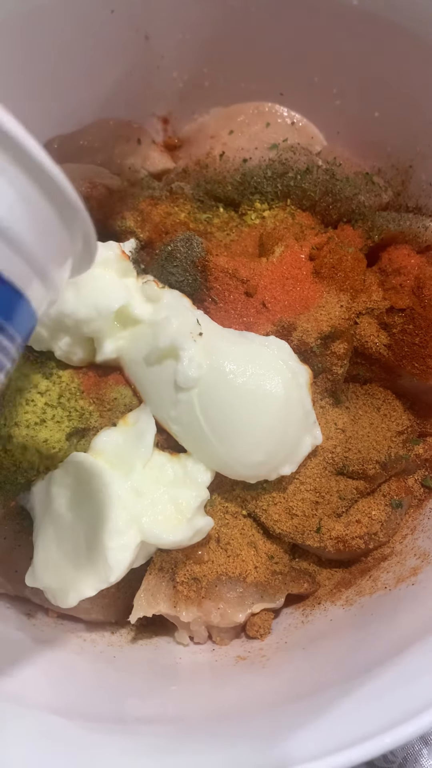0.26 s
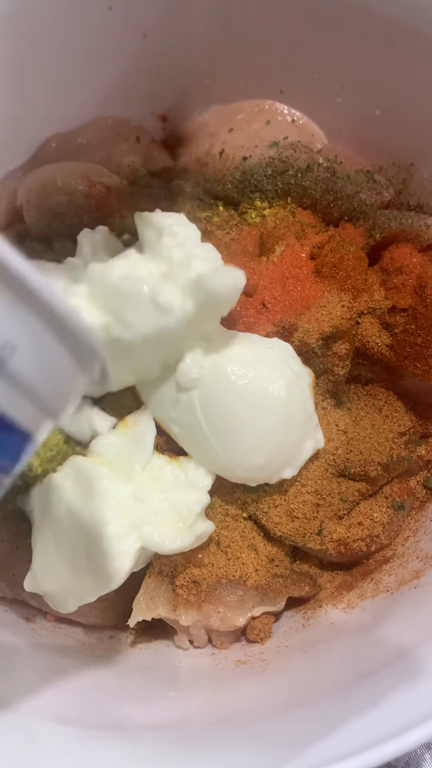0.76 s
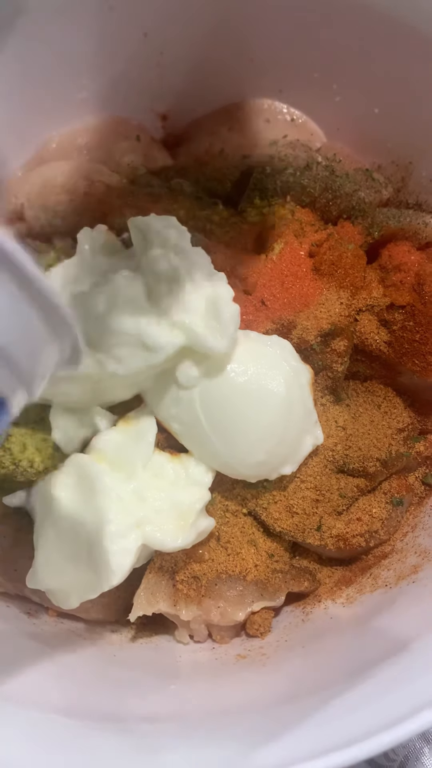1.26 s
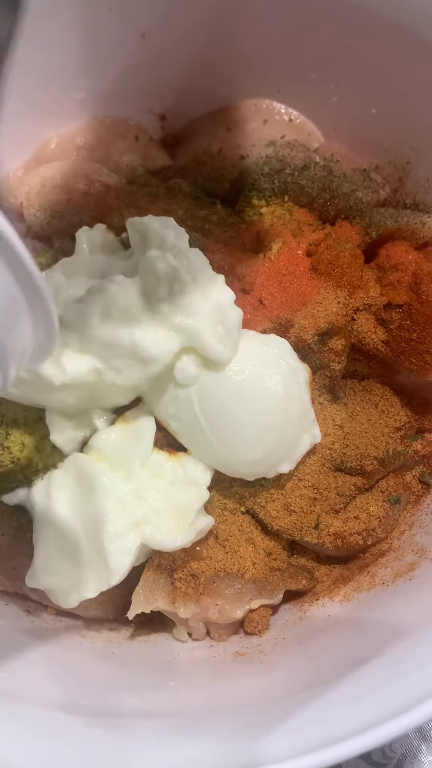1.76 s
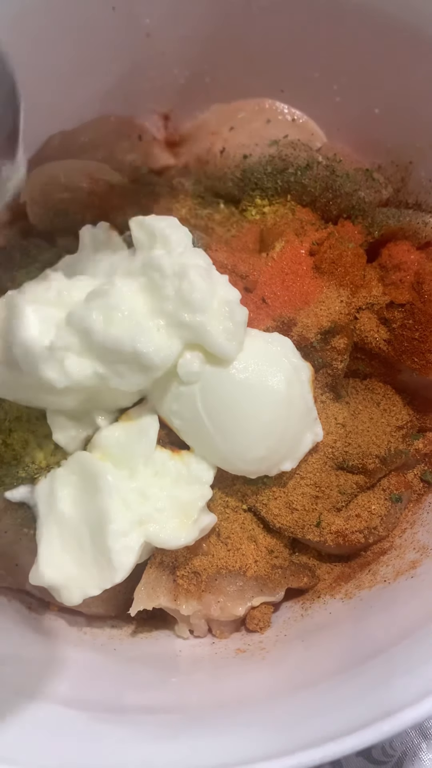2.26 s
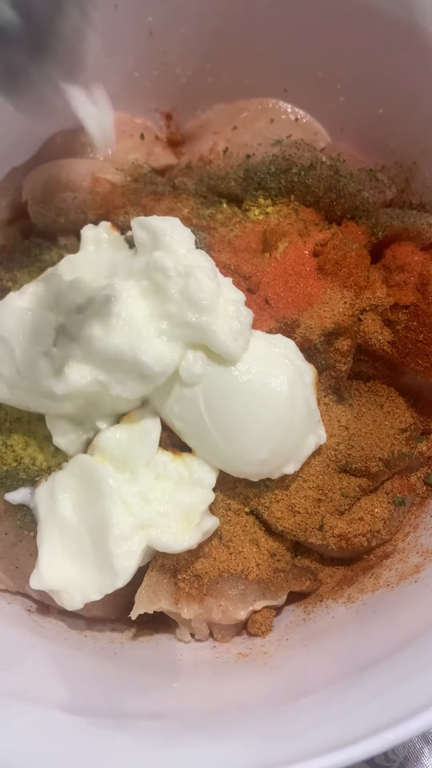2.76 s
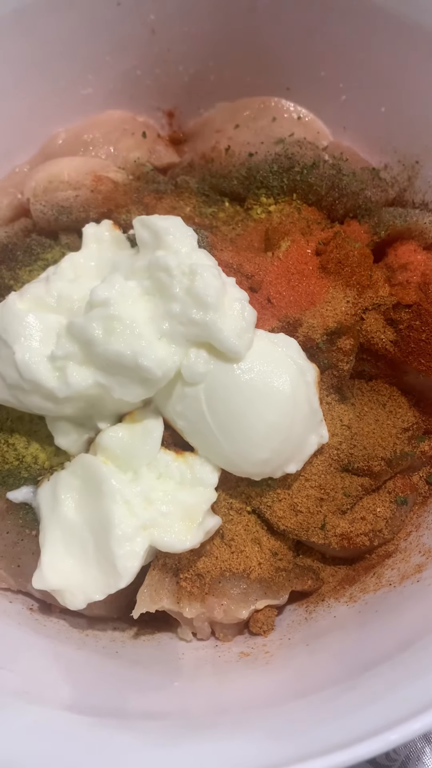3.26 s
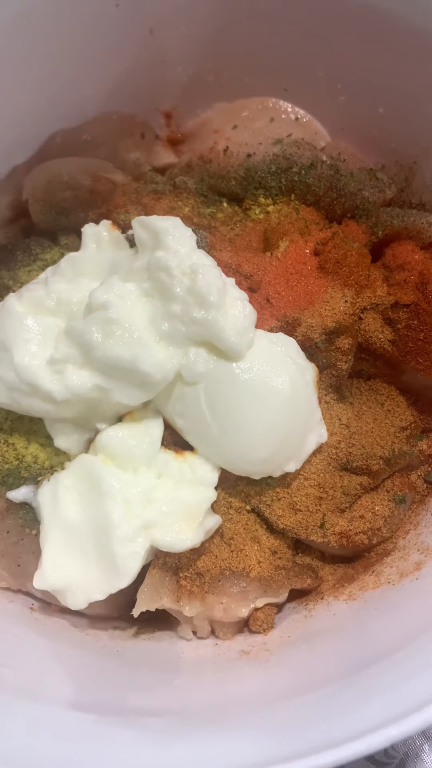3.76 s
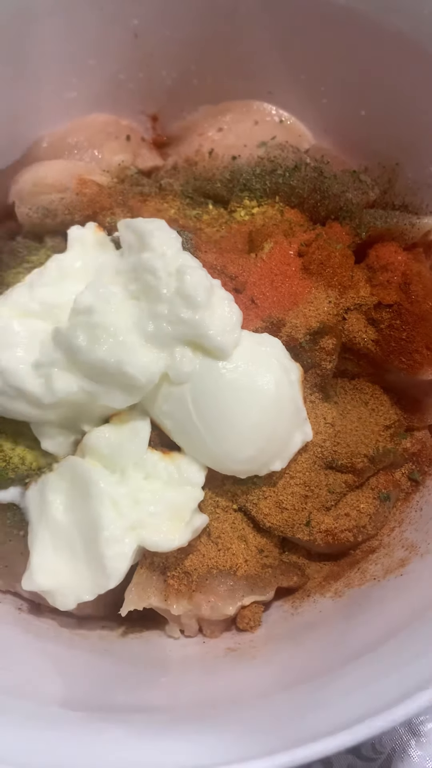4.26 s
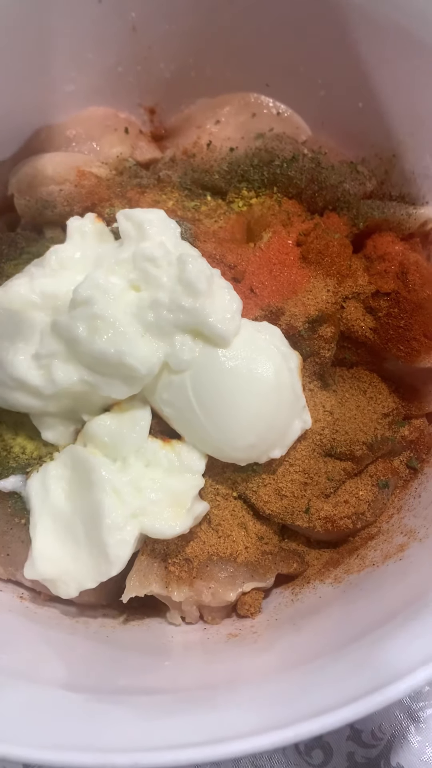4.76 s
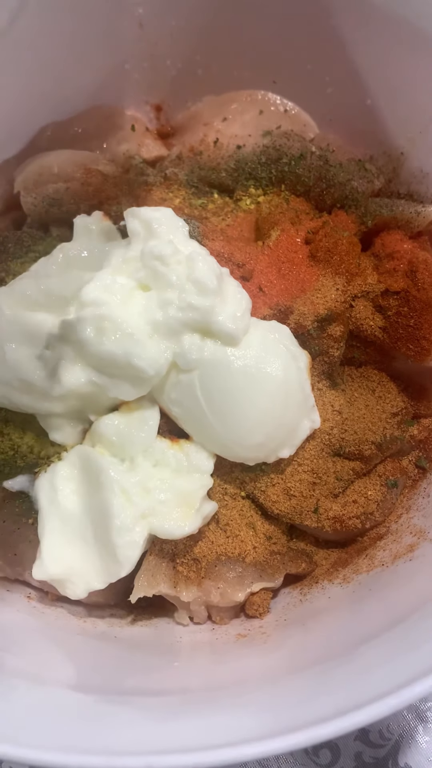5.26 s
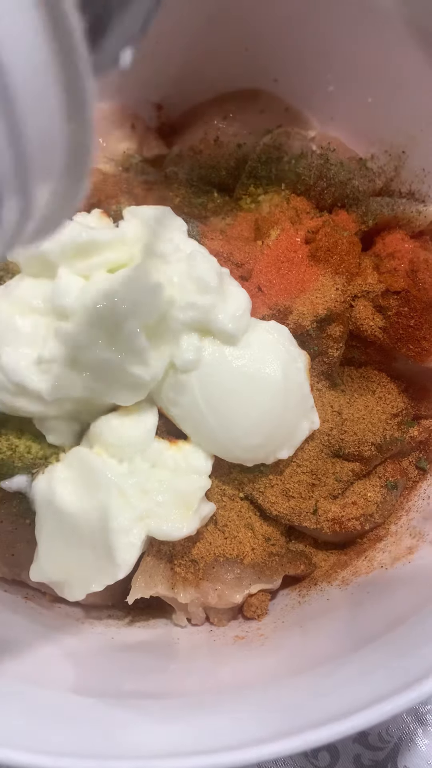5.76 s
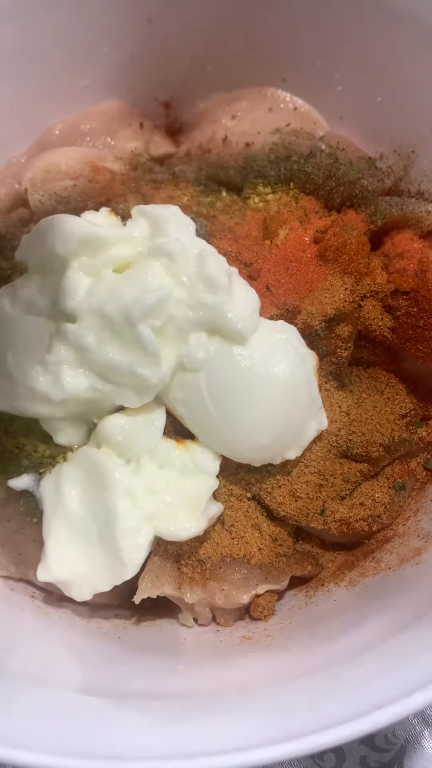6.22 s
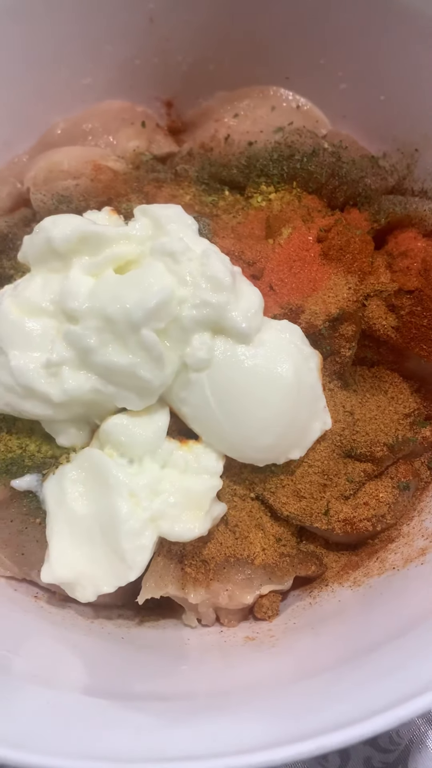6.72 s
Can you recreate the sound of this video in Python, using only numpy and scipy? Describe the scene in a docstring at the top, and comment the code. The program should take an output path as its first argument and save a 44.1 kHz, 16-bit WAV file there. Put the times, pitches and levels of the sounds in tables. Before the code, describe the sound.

A metal spoon knocks sharply and scrapes inside a thin plastic yogurt tub, hollow clacks up close in a quiet, faintly humming kitchen.

```python
"""A steel spoon taps and scrapes inside a thin plastic tub of yogurt, close to a phone in a quiet kitchen.
Each tap is a few ms of crackling contact that sets rim, walls, floor and air cavity ringing; each stroke
is noise of tiny slips through the same resonances, and wet ticks are short bursts of pitched noise.
Further off, decaying lines of noise make a clatter; a faint high whistle, a gliding tone, sweeps down and
up about once a second over the hum of the room, shaped noise. Sparse echoes add the kitchen."""
import sys
import numpy as np
from scipy import signal
from scipy.fft import rfft, irfft, next_fast_len
from scipy.io import wavfile
from scipy.ndimage import uniform_filter1d

SR = 44100
rng = np.random.default_rng(int(sys.argv[2]) if len(sys.argv) > 2 else 0)


def inscribe(sig):
    """Save sig as 16-bit PCM at rate SR to the path in sys.argv[1].

    A 1-D sig is mono; a 2-D sig holds one channel per row.
    Samples are clipped to [-1, 1] before scaling.
    """
    pcm = np.round(np.clip(np.atleast_2d(sig).T, -1, 1) * 32767)
    wavfile.write(sys.argv[1], SR, pcm.astype(np.int16))


N = 308259  # samples, about 7 s

# spoon taps: t/s, peak levels of crack/dB, thump/dB, low wall/dB and cavity/dB, cavity f/Hz,
# upper wall f/Hz (first mode), upper wall peak level/dB, bright edge peak level/dB
TAPS = [(0.2261, -19, -31.5, -43.5, -18.5, 646, 873, -21.5, -22),
        (0.506, -4.5, -47, -23.5, -14.5, 643.5, 980, -14.5, -5),
        (0.8139, -12, -29, -26.5, -27, 668, 960, -26.5, -11.5),
        (0.9389, -8, -52.5, -36, -20.5, 501, 990, -16.5, -12.5),
        (0.9521, -28.5, -60, -42, -33.5, 480, 1023, -39, -25),
        (0.9653, -21.5, -48, -47.5, -26.5, 542, 1001, -11.5, -27),
        (0.9769, -25, -53, -48, -31, 706, 970, -22, -28.5),
        (1.275, -15.5, -40, -22.5, -29.5, 528, 973, -17, -10.5),
        (1.2884, -30.5, -50, -37.5, -50, 680, 1020, -64, -34),
        (1.3541, -12, -31, -36.5, -19.5, 673, 940, -11, -11.5),
        (1.3719, -22, -41, -41, -37.5, 598, 1110, -30.5, -31),
        (1.6364, -4, -37, -16, -19, 673, 1010, -11, -11),
        (1.667, -32, -48, -45.5, -36.5, 650.4, 1050, -26.5, -26),
        (1.673, -28, -44.5, -45, -26, 651, 1140, -17.5, -24.5),
        (1.9627, -29, -34.5, -24.5, -20.5, 519.7, 910, -15, -8.5),
        (2.0541, -21.5, -44, -34, -22, 550.7, 831, -24.5, -41),
        (2.075, -14.5, -50.5, -28, -21.5, 536, 885, -31, -24),
        (3.49, -24, -51, -37.5, -28, 559, 900, -24, -22.5),
        (3.9828, -15.5, -61, -36, -49, 800, 828, -35, -25.5),
        (4.1528, -15, -43, -20, -36.5, 572, 936, -20, -12.5),
        (4.271, -21.5, -64, -34, -50, 570, 990, -46, -33),
        (4.4781, -19, -34, -40, -48.5, 585, 1040, -37, -34.5),
        (4.5283, -11, -32.5, -23.5, -23.5, 653, 1063, -13.5, -22),
        (4.9503, -40, -40.5, -41.5, -44, 624, 1073, -67, -31),
        (5.4248, -17.5, -43, -36.5, -17.5, 588, 930, -14.5, -12),
        (5.4472, -25, -40, -41, -23, 545, 898, -24, -34),
        (6.3405, -39.5, -40.5, -49.5, -57, 732, 850, -42.5, -45),
        (6.4409, -38, -49, -65.5, -59, 540, 1190, -50, -53),
        (6.9109, -30.5, -54.5, -31, -37.5, 618, 1053, -25.5, -36)]
# Resonances: f/Hz, width/Hz (before any damping factor), relative level/dB
CAVITY = [(632.8, 22, 7), (626.6, 100, 2.5)]  # air in the tub, a long ring on a short one: f/Hz, width/Hz, level/dB
LOW_WALL = [(170, 79, -8.5), (309, 100, 0), (403, 78, 4)]  # floor of the tub: f/Hz, width/Hz, level/dB
WALLS = [(950.6, 150, 5), (1246, 230, 3.5), (1248, 120, 8.5), (1834, 590, 0.5)]  # sides of the tub, moved in pitch by each tap: f/Hz, width/Hz, level/dB
RIM = [(2122, 46, 3), (2290, 200, -2), (2840, 260, -2), (3065, 140, -1), (3550, 380, 1), (4410, 900, 0.5)]  # rim of the tub: f/Hz, width/Hz, level/dB
EDGE = [(4750, 600, 1), (5300, 400, -1), (5900, 200, 0), (6650, 200, 0), (7200, 400, -3), (7650, 250, -2),
        (8700, 600, -4)]  # bowl of the spoon: f/Hz, width/Hz, level/dB
# fizz, the top of the contact noise: f/Hz, relative level per Hz/dB
FIZZ = [(8000, -35), (9300, 0.5), (12500, -4.5), (14000, -10.5), (15000, -24), (15800, -59.5)]


def taps(spot_spread_db=3.5, spiky_db=5.5, grip=3.0):
    """A rattling contact rings rim and spoon, damped by the grip, and pushes walls, cavity and tub."""
    # the hand-held tub jolts: f/Hz, width/Hz, level/dB, all for one of two passes
    thump_modes = [(46.6, 17, -1.5), (73, 46, 2.5), (143, 64, -0.5)]
    crack_t60_s, rise_s = 0.018, 0.00045
    fizz_under_edge_db, hand_damping = -14, 1.1
    out, t = np.zeros(N), np.arange(8192) / SR
    chance = rng.standard_normal((len(TAPS), 3, len(t)))
    fall = gain_of(-60 * t / crack_t60_s) * np.minimum(t / rise_s, 1)
    fade_out = np.minimum(4 - 4 * t / t[-1], 1)
    for tap, (noise, spikes, spot) in zip(TAPS, chance):
        s, crack_db, thump_db, low_db, cavity_db, cavity_hz, wall_hz, wall_db, edge_db = tap
        spot_db = spot_spread_db * spot[:8]
        contact = noise * gain_of(spiky_db * spikes) * fall
        contact[20] += 1.4 * abs(contact).max()  # the first touch is one hard click
        # each contact of the rattle pushes the wall one way
        blow = signal.lfilter([1], [1, -.93], peaked(contact) ** 2)
        crack = ring(contact, RIM, spot_db=spot_db, damping=grip)
        edge = ring(contact, EDGE, spot_db=spot_db, damping=grip)
        fizz = colour(spikes, FIZZ) * fall
        walls = ring(blow, WALLS, wall_hz / WALLS[0][0], spot_db=.5 * spot_db)
        cavity = ring(blow, CAVITY, cavity_hz / CAVITY[0][0], damping=hand_damping)
        low_wall = ring(blow, LOW_WALL, spot_db=spot_db)
        thump = ring(ring(blow, thump_modes), thump_modes)
        sound = (gain_of(crack_db) * peaked(crack)
                 + gain_of(edge_db) * peaked(edge)
                 + gain_of(edge_db + fizz_under_edge_db) * peaked(fizz)
                 + gain_of(wall_db) * peaked(walls)
                 + gain_of(cavity_db) * peaked(cavity)
                 + gain_of(low_db) * peaked(low_wall)
                 + gain_of(thump_db) * peaked(thump))
        add(out, s, sound * fade_out)
    return out


def strokes(grain_db=2.5, slips_per_s=5000.0, flutter_db=1.0, patchy_db=2.0, wander=1.0, steady_hz=3000.):
    """Dense tiny slips of steel on wet plastic, heard through spoon, rim, walls and cavity: mono, pair."""
    slips = rng.standard_normal(N) * gain_of(grain_db * np.minimum(rng.exponential(1, N), 4))
    slips *= .3 + (rng.random(N) < slips_per_s / SR)  # single slips stand out of a steady rub
    flutter = evened(uniform_filter1d(uniform_filter1d(rng.standard_normal(N), 300), 300))
    slips *= gain_of(flutter_db * flutter)
    spoon, low_wall, cavity, walls, rim = [
        evened(ring(slips, modes)) for modes in (EDGE, LOW_WALL, CAVITY, WALLS, RIM)]
    fizz = evened(colour(slips, FIZZ))
    fits_db = 4. * drift((1, N), 1, 1500)[0]  # the cavity's ring comes in fits
    cavity = evened(ring(cavity, CAVITY) * gain_of(fits_db))
    layers = np.array([spoon, low_wall, cavity, walls, rim, fizz])
    out = (layers * pressure()).sum(0)
    # as the contact moves over the wall the colour shifts in patches and the direction wanders
    z = signal.stft(out, nperseg=512, noverlap=384)[2]
    z = z * gain_of(patchy_db * drift(z.shape, 9, 14))
    bins = np.fft.rfftfreq(512, 1 / SR)[:, None]
    wander_rad = wander / (1 + bins / steady_hz)  # less wander in the treble
    turn = np.exp(1j * wander_rad * drift(z.shape, 4, 6))
    pair = signal.istft(np.array([z, z * turn]), nperseg=512, noverlap=384)[1][:, :N]
    return out, pair


def pressure():
    """Gain of each part over time: stroke pressure and rattles between close taps, chatter after each tap, a
    short swell before it."""
    # one curve a stroke, or a short rattle of the spoon between close taps: t/s, rubbing level/dB, # walls'
    # lift/dB, cavity's lift/dB above the rubbing; the answers below add to the level and share out the lifts
    stroke_curves = [
        [(0.25, -73, 8, 24.5), (0.308, -54, 1.5, -4.5), (0.418, -37, -9.5, -21.5), (0.43, -33, -16, -24),
         (0.444, -55.5, -3, -6.5), (0.478, -55, -10, -8), (0.49, -52, 0.5, 9)],
        [(0.835, -50.5, -3.5, 7.5), (0.867, -54, -9, -15.5), (0.907, -58, -3, -11), (0.925, -50, -1.5, 5.5)],
        [(0.947, -39, 8, 1), (0.955, -35, 2, 2), (0.967, -46, 14, 3), (0.973, -34, 11, 0), (0.99, -57, 10, 9.5)],
        [(1.18, -84, 19, 14), (1.186, -68, 0.5, -5), (1.206, -57.5, -9.5, -7.5), (1.246, -68.5, -2, -3.5),
         (1.26, -59, -2, 15)],
        [(1.297, -60, 7, 10.5), (1.329, -60, -6, -4.5), (1.338, -51, -7.5, 13.5)],
        [(1.362, -36, 7, 6), (1.368, -62, 7.1, 13), (1.376, -36, 8.1, 4), (1.39, -62, 16.3, 19)],
        [(1.65, -34, 8.3, 14), (1.656, -58, 1, 15), (1.676, -45, 7, 1), (1.695, -83, 10, 20)],
        [(1.98, -55, 4, 17.5), (1.996, -56.5, 8.5, 1), (2.034, -41.5, -6, -8.5), (2.044, -43, -4.5, -1.5),
         (2.058, -35.5, 3.5, -1), (2.082, -34.5, -0.5, -0.5), (2.1, -61, 8, 17.5)],
        [(3.3, -91, 1, 5), (3.304, -85.5, 6.3, 2), (3.334, -78, 10.4, -3.5), (3.4, -90, 14, 5),
         (3.446, -79.5, 11.7, 10), (3.462, -74, 12, -2), (3.468, -70, 5.5, 3)],
        [(3.515, -67, -1, 13), (3.559, -66, 8, 9), (3.605, -31.5, -16, -42), (3.643, -56.5, 0.5, -9),
         (3.687, -66.5, 5, 0), (3.763, -64, 4, -4), (3.82, -80, 5, 3)],
        [(3.838, -80, 12, 15), (3.854, -49, 3.9, -9.5), (3.86, -48, 6.3, -12), (3.872, -70, 3.3, 6.5),
         (3.89, -75, 10, 6)],
        [(4.0, -52.5, -3, -11), (4.044, -67.5, -1.5, -7), (4.114, -47, -10, -18), (4.132, -47, -16.5, -17),
         (4.14, -47, -14, -3.5)],
        [(4.175, -64, 5.5, 14), (4.189, -61.5, 1, 7), (4.229, -32.5, -10, -31), (4.249, -32.5, -9.5, -26),
         (4.313, -56, 7.5, 5), (4.359, -48, -12, -2), (4.38, -73, 5, 14)],
        [(4.43, -79, 5, 7), (4.438, -79, 3, 8), (4.446, -61.5, -9, -15), (4.452, -56, -10, -15),
         (4.46, -65, 0, 4), (4.466, -68, -4, 9)],
        [(4.488, -43, -2, 4), (4.506, -47, -11.5, -11), (4.516, -46, -4, -3)],
        [(4.555, -52.5, 3, 5), (4.605, -41, 1.5, -19), (4.647, -59.5, 13.5, 7), (4.683, -49, 9.5, -10),
         (4.717, -56, -1, 0), (4.781, -46.5, -4, -18), (4.81, -74, -3, -1)],
        [(4.928, -71, 2, 6.5), (4.932, -57, -2, 1), (4.944, -64.5, -2, 7)],
        [(4.953, -45.5, -9, -10), (4.985, -41, -15, -18), (5.011, -50, -8, -10), (5.071, -50, -0.5, 2),
         (5.107, -53, -6, -13.5), (5.157, -44, -6, -5.5), (5.19, -56, 0.5, -14.5)],
        [(5.19, -58.5, 4, 0.5), (5.244, -46.5, -1, 0), (5.274, -53, 3.5, -5), (5.326, -49.5, -3, 4),
         (5.356, -57.5, -6, 0), (5.396, -58, -18, -16), (5.414, -54, -7.5, 24.5)],
        [(5.434, -33, 1.6, 7), (5.44, -50, 3.6, 12), (5.446, -40.5, 1.4, 3.8), (5.452, -38.5, 4.9, 3.3),
         (5.46, -70, 13, 14)],
        [(5.9, -85.5, -2, 3), (5.918, -76, 1, -21), (5.952, -72.5, -19, -26), (5.994, -81, 3, -7),
         (6.26, -73, -14, -24), (6.308, -77, -2, -21), (6.325, -75.5, 4, 0)],
        [(6.36, -71.5, 2.8, -7), (6.39, -75, 3, -13.5), (6.422, -78, 14, 0.5), (6.446, -64.5, 7.6, -12),
         (6.458, -80, 9, -2), (6.48, -79.5, 9, -24), (6.5, -87.5, 5, -1)],
        [(6.93, -69.5, 27, 17), (6.985, -66.5, 7.3, 4.4)],
    ]
    # how spoon, low wall, cavity, walls, rim and fizz answer, in that order:
    # level/dB, share of the walls' lift/1, share of the cavity's lift/1
    part_answers = np.array([(2, 0., 0.), (-10, .7, 0.74), (-0.5, 0.14, 0.75), (-1.5, 1, 0.),
                             (3.5, 0.2, 0.027), (-9, 0, 0.)])
    touch_s = 0.012  # time to touch down or lift off
    # the spoon chatters on after a tap: level under the upper wall's ring, lifts of walls and cavity
    chatter_db, chatter_t60_s, chatter_lift_db = -30, 0.13, (5.5, 12.5)
    # a short swell of noise before each tap: level under the bright edge ahead of the answers, e-fold time
    swell_db, swell_s = -25, .003
    t = np.arange(N) / SR
    answer_db, shares = part_answers[:, :1], part_answers[:, 1:]
    gains = np.zeros((len(part_answers), N))
    for rows in stroke_curves:
        s, rub_db, *lift_db = np.transpose(rows)
        touch = np.clip(np.minimum(t - s[0], s[-1] - t) / touch_s + .5, 0, 1)
        on = touch > 0
        lifts = shares @ [np.interp(t[on], s, db) for db in lift_db]
        gains[:, on] += touch[on] * gain_of(np.interp(t[on], s, rub_db) + lifts)
    chatter, after = np.zeros(N), t[:SR // 3]
    swell_rise = np.exp(-after[::-1, None] / swell_s)
    for s, *_, wall_db, edge_db in TAPS:
        add(chatter, s, gain_of(wall_db + chatter_db - 60 * after / chatter_t60_s))
        add(gains.T, s - len(after) / SR, gain_of(edge_db + swell_db) * swell_rise)
    chatter_gains = chatter * gain_of(shares @ chatter_lift_db)[:, None]
    return gain_of(answer_db) * (gains + chatter_gains)


def ticks():
    """Yogurt lets go of spoon or wall and a film bursts: one or two ms of noise around a pitch."""
    # tiny wet ticks: t/s, peak level/dB, f/Hz
    tick_list = [(0.498, -31.5, 7400), (.5587, -31.5, 12200), (1.5601, -47.5, 11400), (1.7344, -48, 9760),
                 (4.448, -35, 6900), (5.5535, -55, 5520), (5.576, -47, 7080)]
    out, t = np.zeros(N), np.arange(400) / SR
    for (s, db, hz), noise in zip(tick_list, rng.standard_normal((len(tick_list), len(t)))):
        burst = noise * np.exp(-t / 0.00072)
        add(out, s, gain_of(db) * peaked(ring(burst, [(hz, 0.41 * hz, 0)])))
    return out


def clatter():
    """Far off, so the attack is smeared and only ringing lines arrive; the higher ones die sooner."""
    # far clatter: t/s, level/dB, rise at 3 kHz/s, t60 at 1 kHz/s, share of the brighter pieces/1
    clatter_list = [(0.733, -50.5, 0.0077, 0.68, 0.), (0.984, -44, 0.026, 0.5, 0.2),
                    (6.584, -49.5, 0.03, 0.55, 0.98)]
    # what rings in it: f/Hz, width/Hz, level among duller pieces/dB, level among brighter pieces/dB
    crockery_lines = [(471.3, 53, -5, -6), (885, 14, 0.5, -14), (1111, 10, 1.5, 2), (1200, 14, 1.5, -9),
                      (1260, 14, -3.5, -7), (1520, 14, -12, -1), (1748, 60, -15, -10.5),
                      (2420, 170, -13.5, -8.5), (2940, 65, -16, -12.5), (3850, 180, -0.5, -2.5),
                      (4500, 52, -9.5, 8.5), (5300, 40, -11.5, 1), (6040, 87, -7.5, 7),
                      (7400, 300, -20, -0.5), (10370, 300, -14.5, 8.5), (12500, 1500, -17.5, -9.5)]
    out, t = np.zeros((2, N)), np.arange(SR // 2) / SR
    chance = rng.standard_normal((len(clatter_list), 2, len(t)))
    for (s, db, rise, t60, bright), (a, b) in zip(clatter_list, chance):
        for side, noise in zip(out, (a, 1.2 * a + 0.32 * b)):  # the two channels are partly alike
            lines = np.zeros(len(t))
            for hz, width, dull_db, bright_db in crockery_lines:
                line_db = dull_db + bright * (bright_db - dull_db)
                decay_db = -60 * t / t60 * (hz / 1000) ** 0.623
                attack = np.minimum(t / rise * (hz / 3000) ** 0.37, 1)  # low lines build up more slowly
                lines += evened(ring(noise, [(hz, width, 0)])) * gain_of(line_db + decay_db) * attack
            add(side, s, gain_of(db) * lines)
    return out


def whistle():
    """A slightly fuzzy tone, its pitch jittered by smoothed noise, glides down, then quickly up."""
    # one sweep: t from its start/s, f before jitter/Hz, peak level/dB
    sweep_curve = [(0, 15750, -92.5), (0.038, 15500, -66), (.23, 14500, -69.5), (.27, 14600, -69.5),
                   (0.342, 15600, -85)]
    first_s, period_s, jitter_hz = -.07, 1.152, 150
    out, (s, hz, db) = np.zeros(N), np.transpose(sweep_curve)
    starts = first_s + period_s * np.arange(7)
    t = np.arange(0, s[-1], 1 / SR)
    for start, noise in zip(starts, rng.standard_normal((len(starts), len(t)))):
        pitch = np.interp(t, s, hz) + jitter_hz * evened(uniform_filter1d(noise, 60))
        tone = np.sin(2 * np.pi * np.cumsum(pitch) / SR)
        add(out, start, gain_of(np.interp(t, s, db)) * tone)
    return out


def hum():
    """Room hum: random short-time spectra with drifting patches, partly alike in both channels."""
    # colour of the hum: f/Hz, relative level per Hz/dB
    hum_spectrum = [(25, -24), (45, 0.5), (75, 6.5), (130, -4), (300, -9), (600, -19), (1050, -28),
                    (1400, -17), (2000, -29), (3200, -31), (4500, -30.5), (4950, -25.5), (5500, -27),
                    (6500, -36), (10000, -36), (13500, -38.5), (14800, -41.5), (15500, -71.5)]
    # f/Hz, left-right likeness/1
    hum_likeness = [(60, 1), (250, 0.49), (450, 0.1), (2000, 0.05), (3000, 0.16), (4500, 0.96), (16000, 1)]
    level_db = -60.5  # rms over both channels
    frames, hz = N // 256 + 5, np.fft.rfftfreq(1024, 1 / SR)
    a, b, c, d = rng.standard_normal((frames, 513, 4)).T
    same = np.clip(read(hum_likeness, hz), -1, 1)[:, None]
    left, other = a + 1j * b, c + 1j * d
    z = np.array([left, same * left + np.sqrt(1 - same ** 2) * other])
    z *= gain_of(read(hum_spectrum, hz)[:, None] + 2 * drift(a.shape, 3, 12))
    return gain_of(level_db) * evened(signal.istft(z, nperseg=1024, noverlap=768)[1][:, :N])


def kitchen(x, same=0.36):
    """Sparse echoes of random sign, one in every 20 samples, each band dying at its own speed."""
    # reverberation of the kitchen: f/Hz, t60/s
    kitchen_t60 = [(100, 0.78), (500, 0.47), (1500, 0.32), (4000, 0.23), (9000, 0.063), (15000, 0.27)]
    echoes = np.zeros((2, SR))
    at = np.arange(300, SR - 20, 20) + rng.integers(0, 20, (2, (SR - 301) // 20))
    np.put_along_axis(echoes, at, rng.choice([-1., 1.], at.shape), 1)
    echoes[1] = same * echoes[0] + np.sqrt(abs(1 - same ** 2)) * echoes[1]
    hz, t, z = signal.stft(echoes, SR, nperseg=256)
    decay = gain_of(-60 * t / read(kitchen_t60, hz)[:, None])
    tail = signal.istft(z * decay, SR, nperseg=256)[1]
    return signal.fftconvolve(x[None], tail / np.linalg.norm(tail[0]), axes=1)[:, :N]


def ring(x, modes, factor=1, spot_db=np.zeros(8), damping=1):
    """Passes x through resonances of alternating sign; spot_db weighs them by the place struck."""
    out = 0
    for k, (hz, width, db) in enumerate(modes):
        b, a = signal.iirpeak(hz * factor, hz / (width * damping), SR)
        out = out + (-1) ** k * gain_of(db + spot_db[k]) * signal.lfilter(b, a, x)
    return out


def colour(x, spectrum):
    """Filters x by a table of level over frequency."""
    return irfft(rfft(x) * gain_of(read(spectrum, np.fft.rfftfreq(len(x), 1 / SR))), len(x))


def drift(shape, bins, frames):
    """Smooth random field over frequency and time, rms 1."""
    field = rng.standard_normal(shape[::-1]).T
    return evened(uniform_filter1d(uniform_filter1d(field, bins, 0), frames, 1))


def gain_of(db):
    """Amplitude factor of a level in dB."""
    return 10 ** (np.asarray(db) / 20)


def evened(x):
    """Scales x to rms 1."""
    return x / np.sqrt(np.mean(x ** 2) + 1e-20)


def peaked(x):
    """Scales x to peak 1."""
    return x / abs(x).max()


def read(points, hz):
    """Reads a table of values over frequency, interpolated along log frequency."""
    f, value = np.transpose(points)
    return np.interp(np.log(hz + 1), np.log(f + 1), value)


def add(mix, s, sound):
    """Adds sound into mix at s seconds, cut off at either end."""
    at = round(s * SR)
    part = mix[max(at, 0):][:len(sound) + min(at, 0)]
    part += sound[max(-at, 0):][:len(part)]


def scene():
    """Spoon and tub close by, their echo in the kitchen, then the far clatter, whistle and hum."""
    knocks = taps() + ticks()
    rubbing, rubbing_pair = strokes()
    echo = gain_of(-18.5) * kitchen(knocks + rubbing)
    return knocks + rubbing_pair + echo + clatter() + whistle() + hum()


def record(dry):
    """The stereo pair shifts phase and balance between its channels; then the band limit."""
    # the stereo pair: f/Hz, phase by which the left leads/rad, left minus right level/dB
    pair_offsets = [(0, 0, -1), (150, -.2, -1.5), (350, -.5, 1), (620, -.8, -5), (1000, -.5, -1),
                    (1600, .1, -3), (2000, .9, 0), (2400, 2.4, -1), (2800, 1., -1), (3800, 1.7, 1),
                    (4650, 3.14, 0), (8900, 9.42, 0), (13200, 15.7, 0), (15300, 18.8, 0), (22050, 19, 0)]
    # overall treble roll-off: f/Hz, level/dB
    treble_rolloff = [(20, -1), (13500, 1.5), (15000, 2), (16000, -15), (17000, -29)]
    band_limit_hz = 16600
    size = next_fast_len(N + 4096)
    hz, lead, balance_db = np.transpose(pair_offsets)
    bins = np.fft.rfftfreq(size, 1 / SR)
    left = gain_of(np.interp(bins, hz, balance_db) / 2)
    right = np.exp(-1j * np.interp(bins, hz, lead)) / left
    responses = np.array([left, right]) * gain_of(read(treble_rolloff, bins))
    paired = irfft(rfft(dry, size) * responses, size)[:, :N]
    low_pass = signal.firwin(511, band_limit_hz, window=("kaiser", 9), fs=SR)
    return signal.oaconvolve(paired, low_pass[None], "same")


dry = scene()
out = record(dry)
inscribe(out)
```